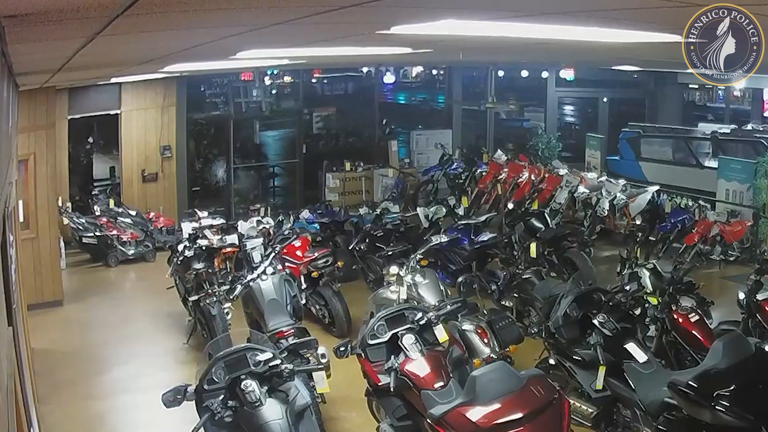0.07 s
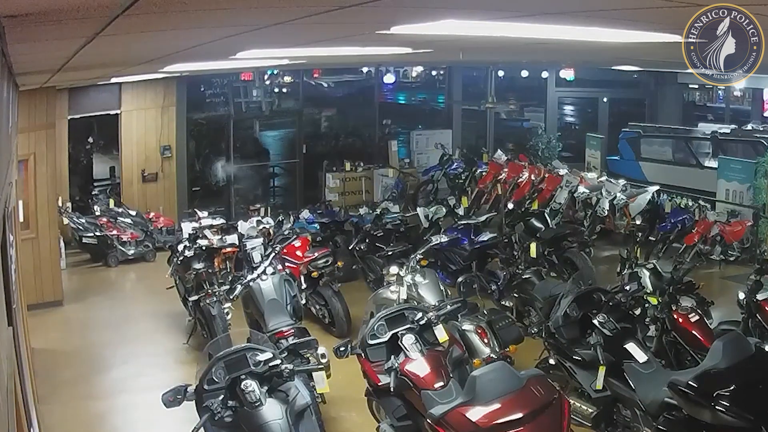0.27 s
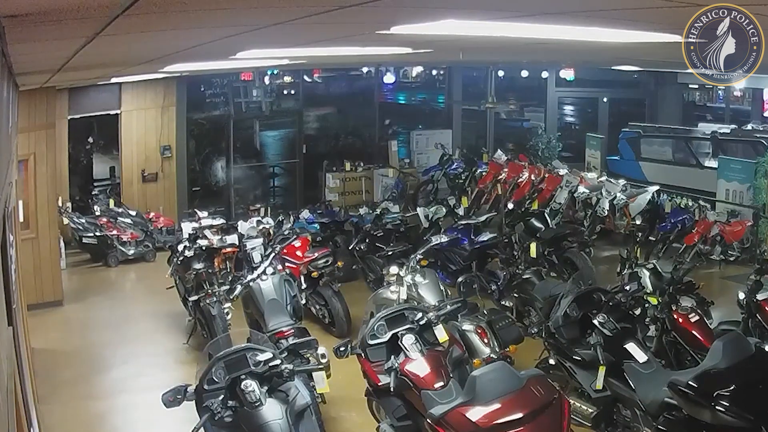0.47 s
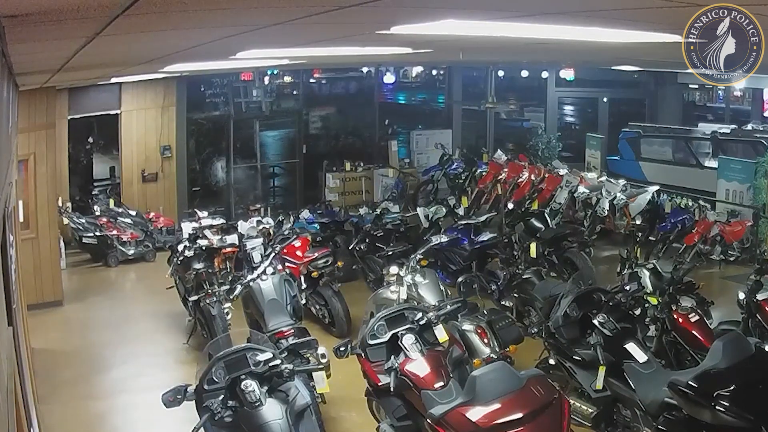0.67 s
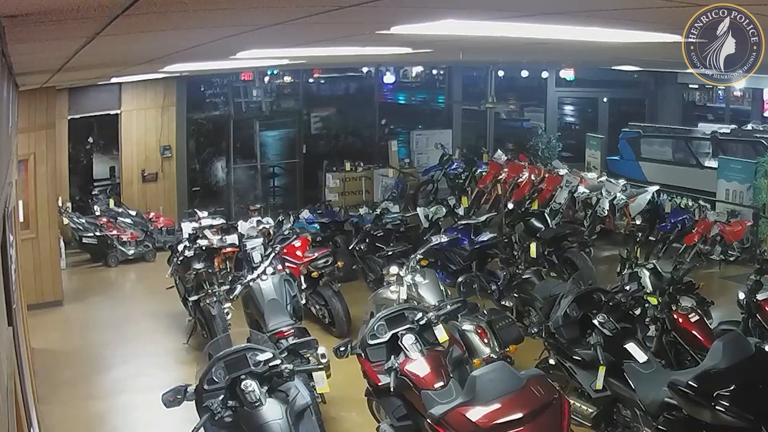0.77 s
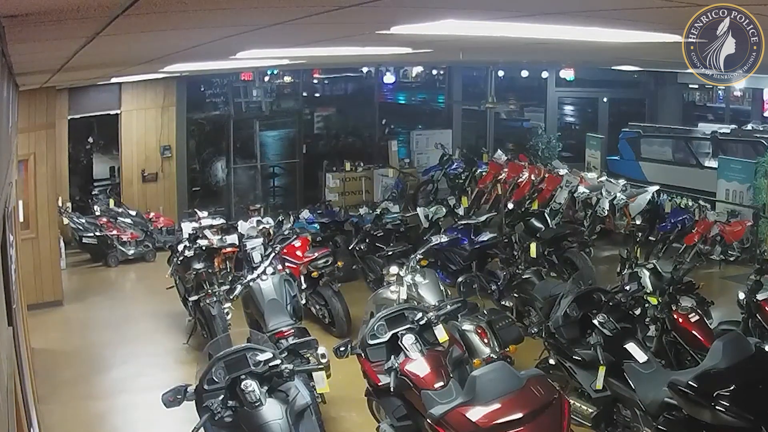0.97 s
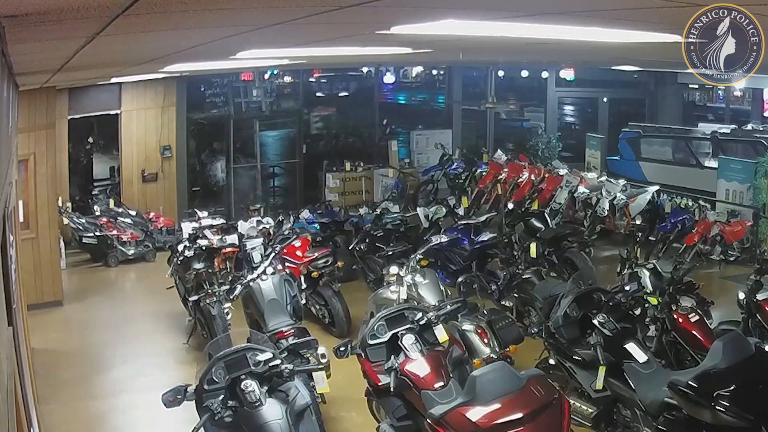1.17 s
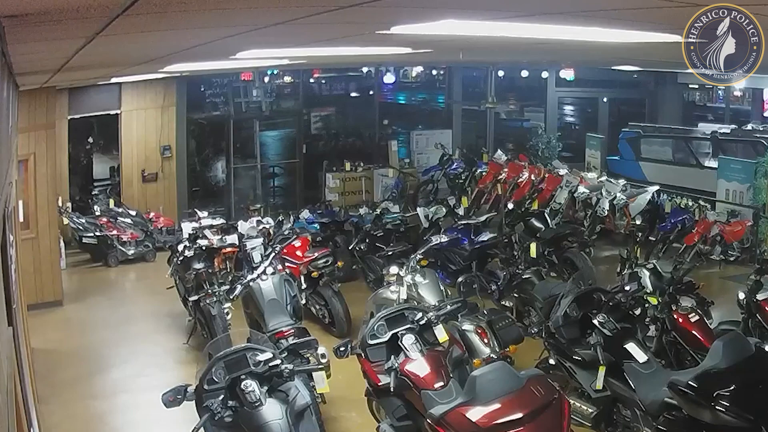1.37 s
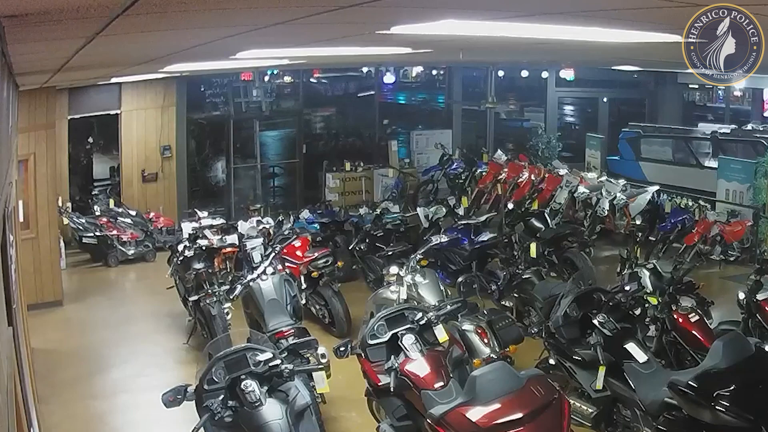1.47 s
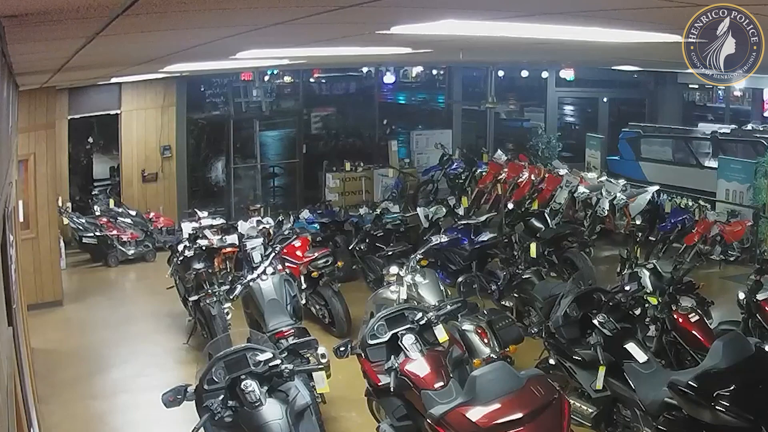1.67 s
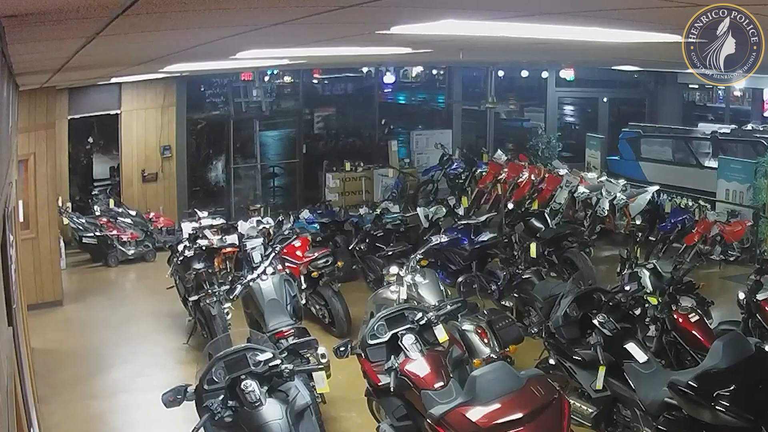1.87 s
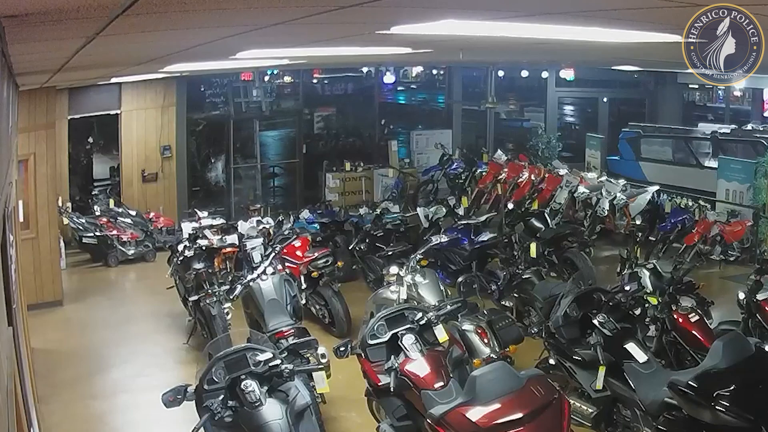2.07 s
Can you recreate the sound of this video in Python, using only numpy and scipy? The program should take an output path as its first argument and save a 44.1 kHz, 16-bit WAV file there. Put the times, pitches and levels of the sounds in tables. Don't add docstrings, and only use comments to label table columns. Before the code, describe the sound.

A glass door shatters in a large reverberant showroom. Faint hum and tiny glass stirs until a brief dip just before 0.2 s; then a violent, clipped crash at 0.22 s, cracking on to 0.4 s with a low thud and frame knocks. Clinks at 0.45-0.6 s thin out; glass and frame rattle around 1.1-1.5 s; a brighter shard cascade peaks near 1.75 s, then scattered tinkles until the end. Distant, sharp-edged microphone.

```python
import sys
import numpy as np
from scipy import signal
from scipy.fft import rfft, irfft, next_fast_len
from scipy.io import wavfile
from scipy.ndimage import map_coordinates

SR = 44100
rng = np.random.default_rng(int(sys.argv[2]) if len(sys.argv) > 2 else 0)


def bounce(signal):
    frames = np.transpose(np.atleast_2d(signal))
    limited = np.clip(frames, -1, 1)
    pcm = np.round(limited * 32767).astype(np.int16)
    wavfile.write(sys.argv[1], SR, pcm)


def level_to_linear(level):
    exponent = np.asarray(level, float) / 20
    return 10 ** exponent


N = 94815

# frequency in Hz, density in dB per Hz.
SHARD_TONE = [(60, -51.5), (400, -32), (1200, -25.5), (2300, -10), (3200, 4.5), (4100, -9.5), (5200, -20),
              (7300, -30)]


def unit(x):
    return x / np.sqrt(np.mean(x ** 2) + 1e-20)


def along(points, hz):
    f, v = np.transpose(points)
    return np.interp(np.log(hz + 1), np.log(f + 1), v)


def curve(rows):
    s, v = np.transpose(rows)
    return np.interp(np.arange(N) / SR, s, v)


def uneven(depth_db, per_s):
    levels = rng.standard_normal(300)
    return level_to_linear(depth_db * map_coordinates(levels, [np.arange(N) * per_s / SR]))


def coloured(x, tone):
    m = 2 ** 13
    level_db = np.maximum(along(tone, np.fft.rfftfreq(m, 1 / SR)), -90)
    cepstrum = irfft(np.log(level_to_linear(level_db)), m)
    cepstrum[1:m // 2] *= 2
    cepstrum[m // 2 + 1:] = 0
    response = irfft(np.exp(rfft(cepstrum)), m)[:m // 2]
    return signal.fftconvolve(x, response / np.linalg.norm(response))[:N]


def add(track, s, sound):
    part = track[round(s * SR):][:len(sound)]
    part += sound[:len(part)]


def room_hum():
    # frequency in Hz, level in dB.
    hum_tone = [(20, -21), (400, -33), (1500, -19), (3200, -5), (7300, -18)]
    return level_to_linear(-70) * coloured(rng.standard_normal(N), hum_tone)


def thuds():
    # start in seconds, level in dB, rise in seconds.
    rumbles = [(0, -64.5, .05), (0.221, -38.5, 0.08), (.32, -28.5, 0.032), (0.451, -39.5, 0.044),
               (.62, -49.5, 0.035), (.72, -53, 0.043), (.88, -59.5, 0.078), (1.1, -60.5, 0.068),
               (1.28, -64.5, 0.014), (1.35, -50, 0.036), (1.421, -49.5, .04), (1.5, -53, 0.022),
               (1.72, -59, 0.029), (1.821, -55, 0.027)]
    # frequency in Hz, level in dB.
    floor_tone = [(20, -4.5), (60, 8.5), (130, -2.5), (300, 1), (500, -8.5), (1000, -49.5)]
    out, t = np.zeros(N), np.arange(SR // 2) / SR
    for s, db, rise_s in rumbles:
        swell = np.e * t / rise_s * np.exp(-t / rise_s)
        add(out, s, level_to_linear(db) * swell * rng.standard_normal(len(t)))
    return coloured(out, floor_tone)


def shards():
    # time in seconds, level in dB.
    shower = [
        [(0, -42), (.2, -56.5)],
        [(.218, -7.5), (.45, -18.5), (.6, -29.5), (.69, -40), (1.03, -42.5), (1.15, -27), (1.24, -38),
         (1.4, -31.5), (1.46, -33), (1.51, -32), (1.62, -38), (1.72, -24.5), (1.81, -28.5), (1.99, -44.5),
         (2.07, -31.5), (2.15, -24)],
    ]
    shards_per_s, life_cycles = 6000, 2.2
    pitch_hz, pitch_spread = 3000, 0.799
    size_db, biggest_db = 2, 7
    r = rng.random((14000, 3))
    at = np.cumsum(-np.log(r[:, 0])) / shards_per_s
    hz = pitch_hz * np.exp(pitch_spread * rng.standard_normal(len(r)))
    hz = np.clip(hz, 200, 9000)[:, None]
    t = np.arange(250) / SR
    size = level_to_linear(np.minimum(-size_db * np.log(r[:, 1:2]), biggest_db))
    ringing = np.sin(2 * np.pi * (hz * t + r[:, 2:]))
    pings = size * np.exp(-t * hz / life_cycles) * ringing
    where = (at * SR).astype(int)[:, None] + np.arange(len(t))
    rain = np.bincount(where.ravel(), pings.ravel(), N)[:N]
    strength = level_to_linear(curve(shower[0] + shower[1])) * uneven(0.5, 90)
    return strength * unit(coloured(rain, SHARD_TONE))


def clinks():
    # time of the peak in seconds, peak level in dB.
    pieces = [(.062, -35), (0.465, -23.5), (0.501, -26.5), (.526, -31.5), (0.545, -34.5), (0.588, -23),
              (.964, -36), (1.139, -26), (1.188, -28), (1.265, -31.5), (1.386, -35), (1.47, -34.5),
              (1.499, -23.5), (1.569, -31.5), (1.616, -44), (1.668, -22.5), (1.691, -22.5), (1.714, -16.5),
              (1.738, -12.5), (1.778, -12.5), (1.803, -15), (1.822, -16), (1.872, -24), (1.897, -27.5),
              (1.962, -26.5), (2.057, -24.5), (2.076, -23), (2.091, -36), (2.133, -24)]
    level_db, rise_s = -3, .005
    out, u = np.zeros(N), np.arange(SR // 10) / SR / rise_s
    for s, db in pieces:
        burst = np.e * u * np.exp(-u)
        add(out, s - .003, level_to_linear(db + level_db) * burst * rng.standard_normal(len(u)))
    return coloured(out, SHARD_TONE)


def blows():
    # start in seconds, level in dB.
    cracks = [(0.203, -22), (.216, -7.5), (.235, -9), (0.261, -15.5), (.28, -11), (.3, -35), (0.333, -19.5),
              (.37, -37), (.41, -22.5), (0.459, -43), (0.574, -59)]
    # frequency in Hz, density in dB per Hz.
    crack_tone = [(15, -58), (25, -26.5), (263, -8), (475, -14.5), (535, -18), (1670, -8), (3180, -8),
                  (4230, -13), (7300, -20), (9490, -72), (16100, -120)]
    crack_t60_s, roar_t60_s, roar_db = 0.16, 1.84, -33.5
    out, t = np.zeros(N), np.arange(SR) / SR
    for s, db in cracks:
        decay = level_to_linear(-60 * t / crack_t60_s) + level_to_linear(roar_db - 60 * t / roar_t60_s)
        add(out, s, level_to_linear(db) * decay * rng.standard_normal(len(t)))
    return coloured(out, crack_tone)


def frame():
    # start in seconds, level in dB, pitch in Hz.
    knocks = [(.215, -36, 1018), (.232, -17, 732), (.235, -17.5, 561), (.255, -22.5, 253),
              (.49, -36.5, 528), (.568, -36, 555), (.661, -39, 1040), (.966, -48, 547), (.966, -48.5, 1018),
              (1.105, -45.5, 700), (1.108, -47, 958), (1.115, -38, 542), (1.127, -42, 468),
              (1.135, -41, 997), (1.14, -44.5, 820), (1.255, -49.5, 1037), (1.295, -39.5, 702),
              (1.305, -37, 550), (1.312, -43, 953), (1.328, -31.5, 539), (1.355, -43.5, 502),
              (1.35, -44, 1014), (1.728, -56, 750), (2.124, -59.5, 674)]
    rise_s, t60_s, sag_per_s = 0.0027, .08, 0.13
    out, t = np.zeros(N), np.arange(SR // 5) / SR
    for s, db, hz in knocks:
        envelope = level_to_linear(db + 5 - 60 * t / t60_s) * (1 - np.exp(-t / rise_s))
        add(out, s, envelope * np.sin(2 * np.pi * hz * t * (1 - sag_per_s * t)))
    return out * uneven(3.5, 120)


def hall(x):
    # frequency in Hz, reverberation time T60 in seconds.
    decay = [(100, 0.52), (1000, .6), (3000, 0.65), (6000, 0.32)]
    out, step = np.zeros(N), SR // 5
    for k in range(0, N, step):
        hz, t, z = signal.stft(rng.standard_normal(SR), SR, nperseg=256)
        fading = z * level_to_linear(-60 * t / along(decay, hz)[:, None])
        tail = signal.istft(fading, SR, nperseg=256)[1]
        add(out, k / SR + .008, signal.fftconvolve(x[k:k + step], tail / np.linalg.norm(tail)))
    return out


def scene():
    hum = room_hum()
    metal = thuds() + frame()
    glass = shards() + clinks() + blows()
    direct = level_to_linear(-2.5) * (glass + metal)
    reverberant = level_to_linear(-6.5) * hall(glass + level_to_linear(-5.5) * metal)
    return (direct + reverberant + hum)[None]


def top_cut(x):
    return signal.sosfilt(signal.butter(12, 7720, fs=SR, output="sos"), x)


def record(dry):
    # time in seconds, gain in dB.
    dip = [
        (.143, 0),
        (.155, -4.5),
        (.185, -22.5),
        (.2, 10.5),
        (.204, 1),
    ]
    drive_db, clip_top, clip_hard = 0.5, .5, 5
    top_hz, edge_hz = 7153, 200
    x = dry * level_to_linear(drive_db + curve(dip))
    x = x / (1 + np.abs(x / clip_top) ** clip_hard) ** (1 / clip_hard)
    m = next_fast_len(N + 4096)
    hz = np.fft.rfftfreq(m, 1 / SR)
    loss_db = np.clip((hz - top_hz) / edge_hz, 0, 10) * 10
    x = irfft(rfft(x, m) * level_to_linear(-loss_db), m)[..., :N]
    return top_cut(x)


dry = scene()
out = record(dry)
bounce(out)
```